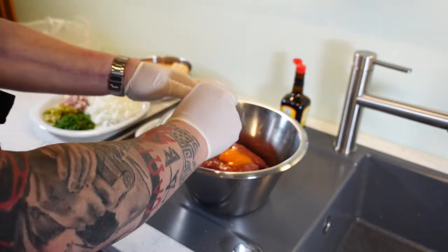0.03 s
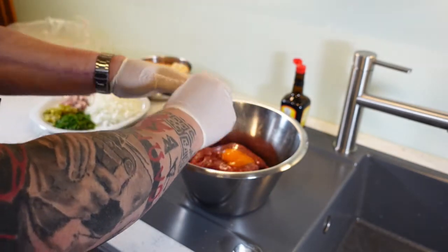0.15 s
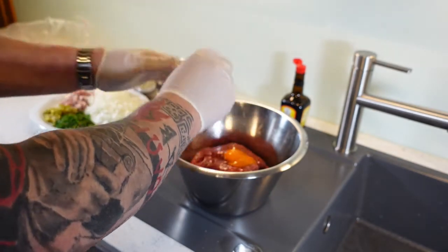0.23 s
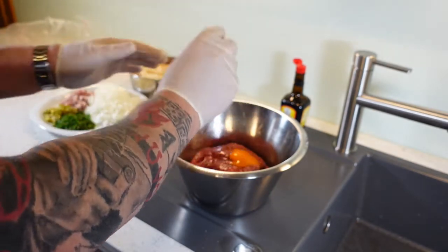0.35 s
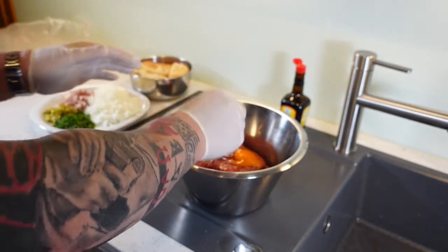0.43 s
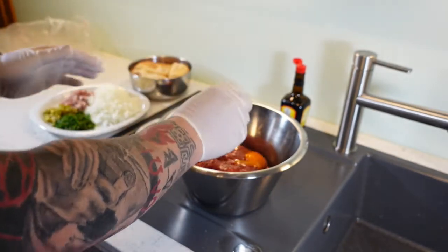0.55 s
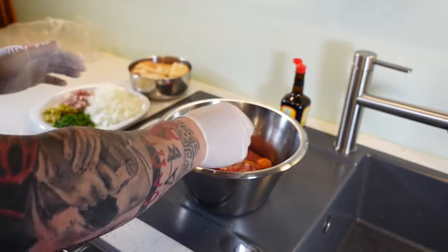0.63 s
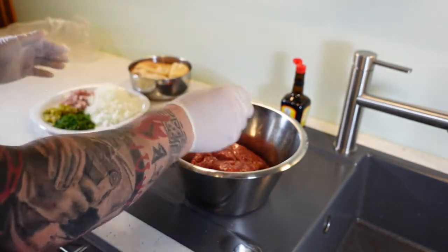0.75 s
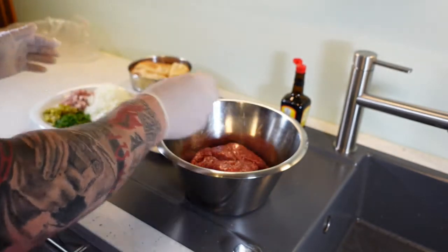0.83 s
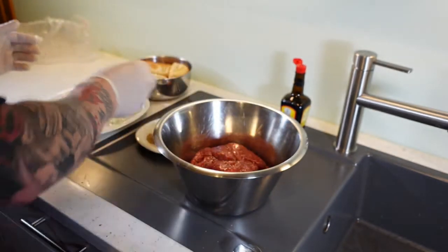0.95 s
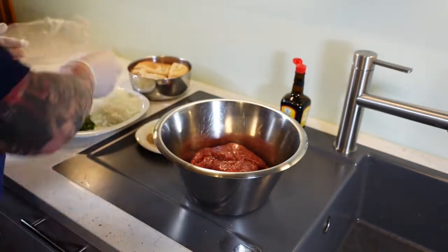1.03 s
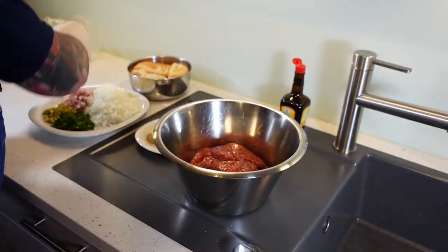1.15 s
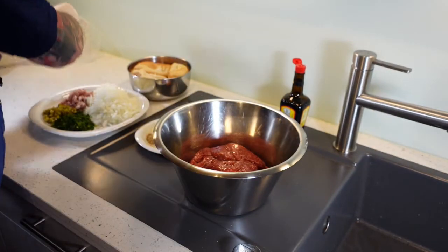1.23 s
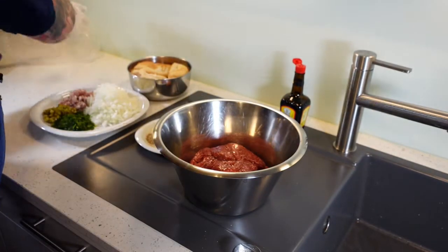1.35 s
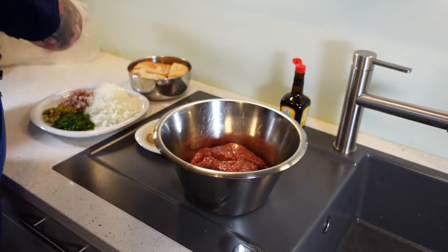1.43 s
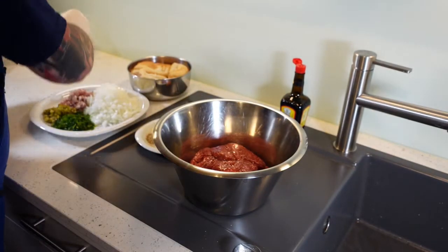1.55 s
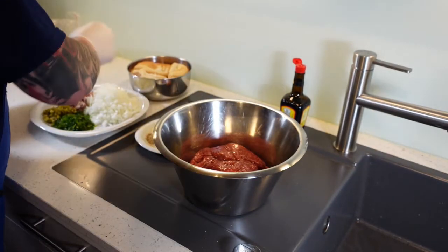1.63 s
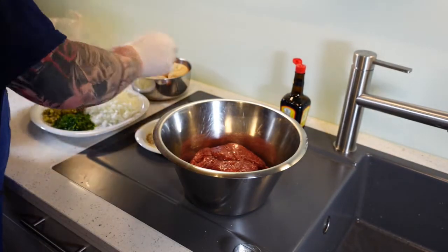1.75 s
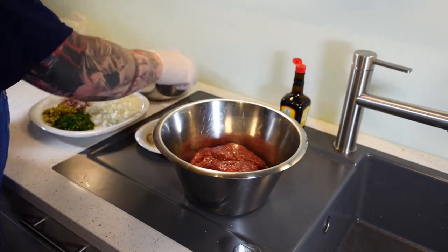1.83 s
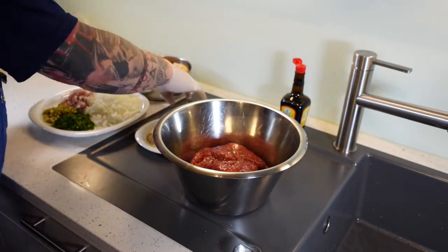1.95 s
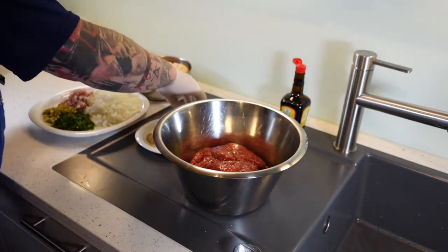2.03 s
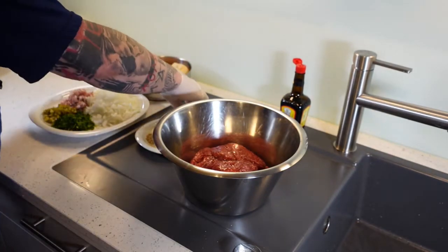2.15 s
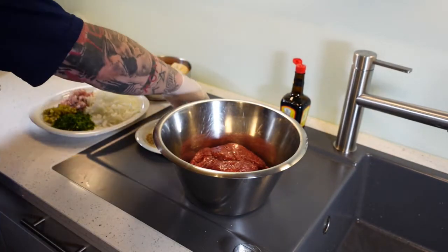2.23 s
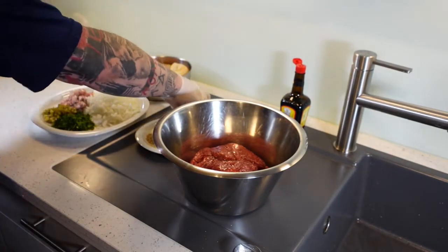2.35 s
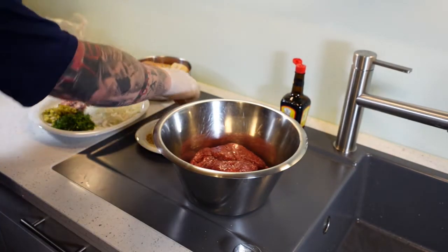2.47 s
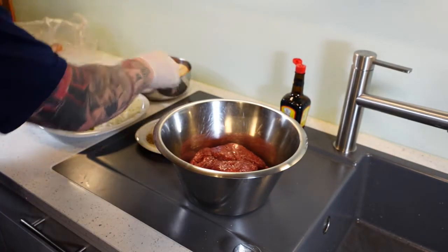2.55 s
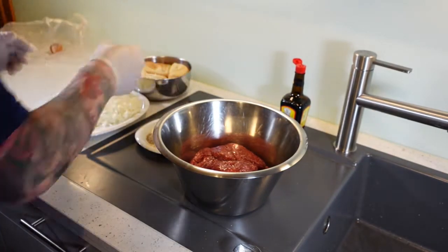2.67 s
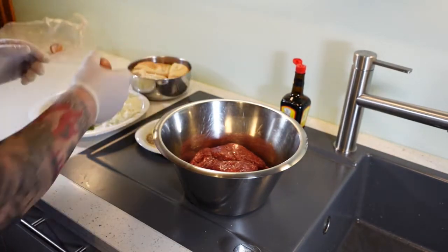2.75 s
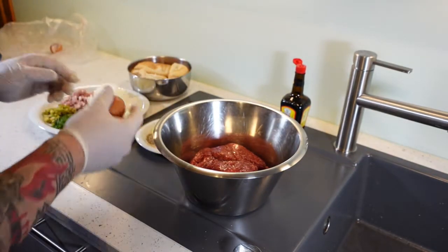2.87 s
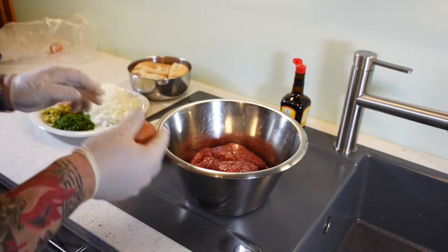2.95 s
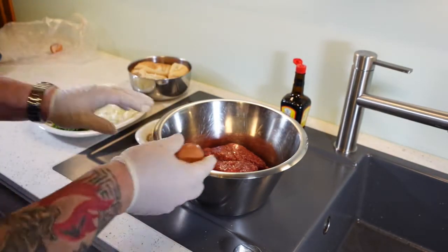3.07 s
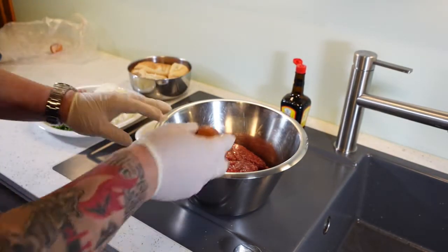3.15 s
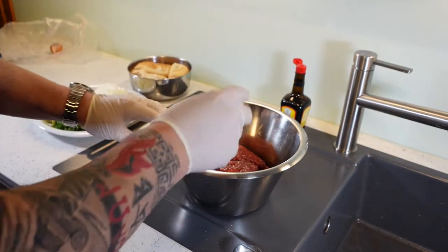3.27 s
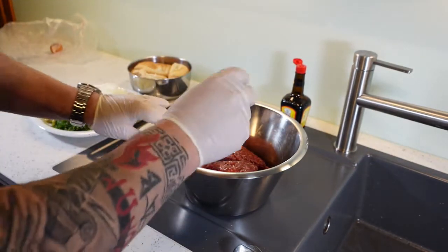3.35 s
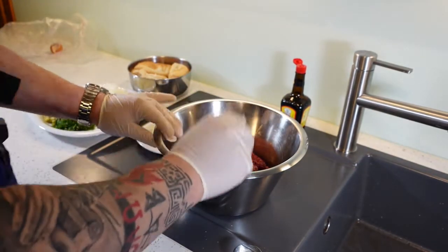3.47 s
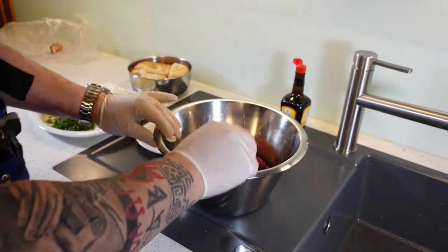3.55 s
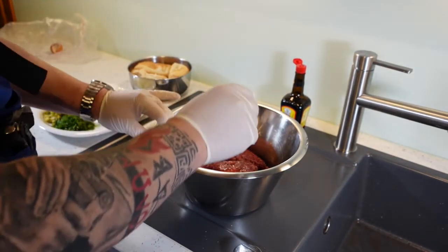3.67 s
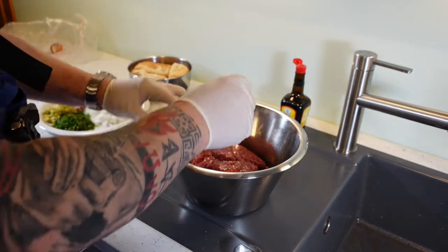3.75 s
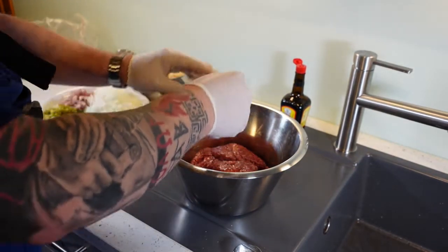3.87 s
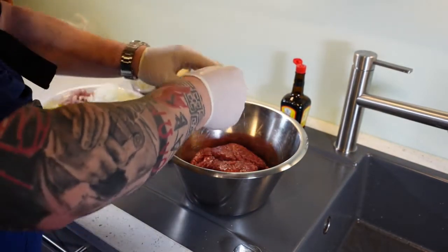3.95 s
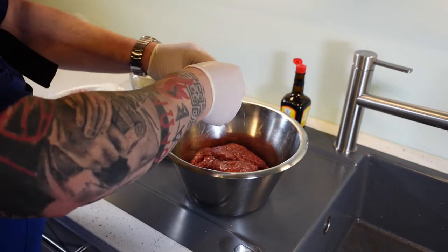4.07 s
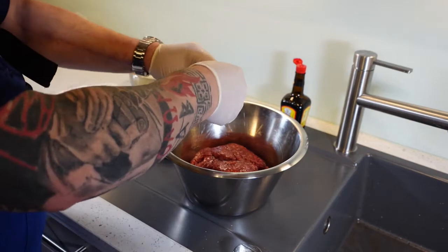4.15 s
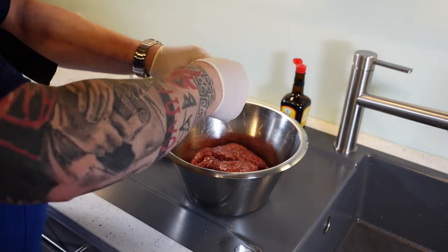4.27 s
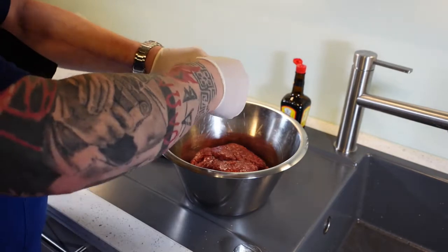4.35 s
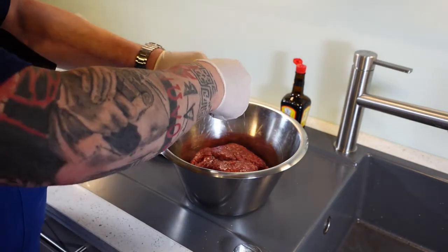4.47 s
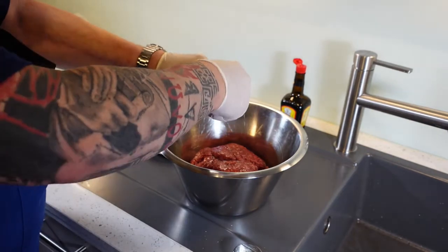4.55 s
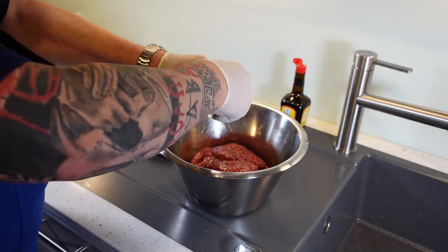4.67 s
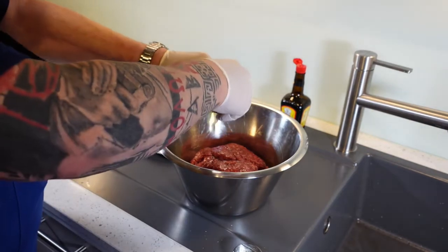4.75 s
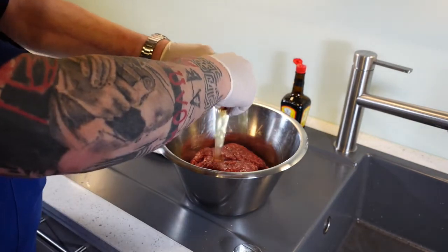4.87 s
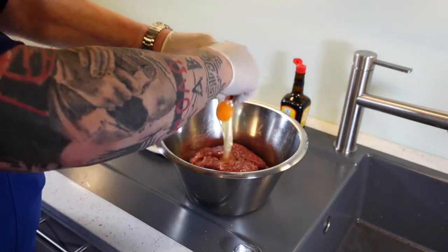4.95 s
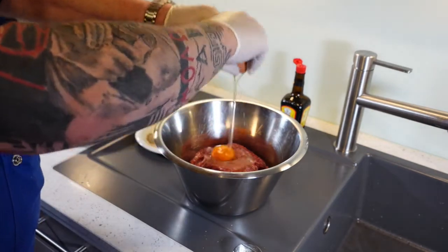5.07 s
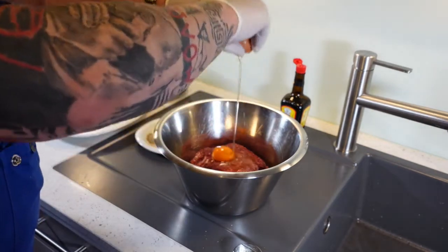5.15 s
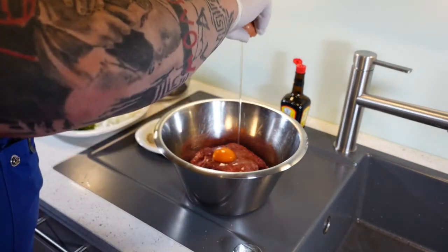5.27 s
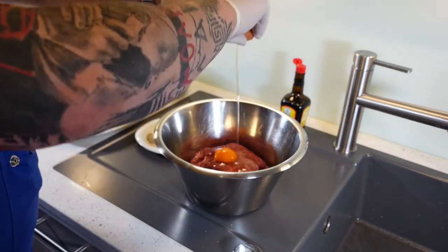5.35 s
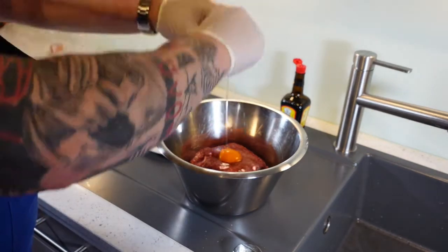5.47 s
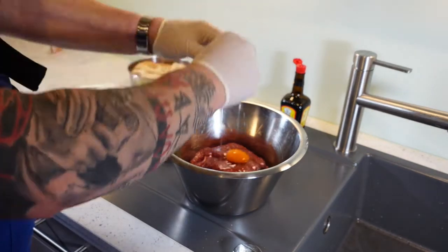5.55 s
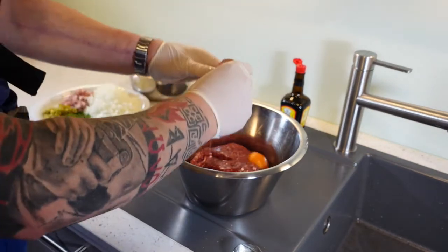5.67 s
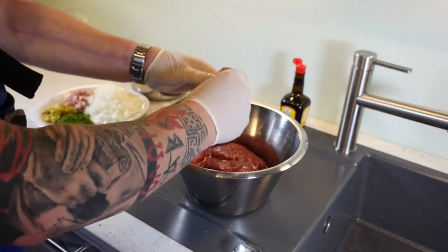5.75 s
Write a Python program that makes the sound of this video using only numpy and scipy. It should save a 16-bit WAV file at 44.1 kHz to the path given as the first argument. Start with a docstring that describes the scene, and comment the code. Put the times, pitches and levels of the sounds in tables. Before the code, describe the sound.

Close stereo microphones in a bright, hard-walled kitchen with low steady ventilation. A sharp eggshell snap and small crackles open, then the shell lands in crinkling thin plastic. An egg rolls faintly in a dish. A soft bump precedes one hard, crunching knock on a steel bowl; the rim rings long and wavering while the shell is cracked open with brittle snaps and gloved rubbing.

```python
"""Shell snaps, plastic crinkles and a hard knock sets a steel bowl ringing in a bright, echoing kitchen.
Gloved hands snap one egg apart, drop the shell in a bin bag and fetch the next egg from a dish.
After a soft bump that egg is knocked on the rim and pulled open, over steady ventilation.
Cracks, knocks and thuds are shaped noise bursts; shell, bowl and rim are decaying sine modes;
rubbing, rolling, sliding and plastic are crackle under moving gains, and dense echoes surround them."""
import sys
import numpy as np
from scipy import signal
from scipy.fft import rfft, irfft
from scipy.io import wavfile
from scipy.ndimage import uniform_filter1d

SR = 44100
rng = np.random.default_rng(int(sys.argv[2]) if len(sys.argv) > 2 else 0)


def transcribe(u):
    """Save the signal u as a 16-bit wav file named by the first command-line argument.

    u: samples, shape (n,) or (channels, n), limited to [-1, 1]; the rate is SR.
    q: integer samples, one column per channel.
    """
    v = np.clip(np.atleast_2d(u).T, -1, 1)
    q = np.round(v * 32767).astype(np.int16)
    wavfile.write(sys.argv[1], SR, q)


N = 256220
TIME = np.arange(N) / SR  # seconds
KNOCK_S = 3.4862  # the moment the egg meets the rim
SHELL_T60_S = 0.0077  # the hand damps the hollow shell

# Levels in the tables are relative: layer gains, filters and echoes act on them later.
# A t60 is the time to fade by 60 dB. A "colour" is the spectrum of a noise filter.

# Steady ventilation. Each row: frequency in Hz, relative level in dB.
AIR_COLOUR = [(15, -62), (25, -24), (55, -19.5), (229, 2.5), (373, -0.5), (531, -6), (1070, -6.5),
              (1740, -6.5), (3250, -7.5), (3720, -8.5), (6210, -9.5), (12200, -16.5), (14400, -18),
              (16000, -15.5)]
# Left-right likeness of the ventilation. Each row: frequency in Hz, likeness from 0 to 1.
AIR_LIKENESS = [(40, 0.59), (400, 0.5), (1400, 0.75), (3000, 0.93), (10000, 0.98)]
# Decay of the kitchen's echoes. Each row: frequency in Hz, t60 in seconds.
KITCHEN_DECAY = [(150, 0.57), (500, 0.46), (1500, 0.49), (3500, 0.49), (8000, 0.44), (15000, 0.31)]
# Left-right likeness of the echoes. Each row: frequency in Hz, likeness from 0 to 1.
ECHO_LIKENESS = [(40, .4), (130, .8), (300, .95), (700, .92), (1500, .87), (5000, .88), (14000, .92)]

# Dull bumps on the worktop and bowl.
# Each row: start in seconds, level in dB, pitch in Hz, t60 in seconds.
BUMP_HITS = [(.728, -57.5, 183, 0.42), (3.203, -37, 182, 0.11), (3.52, -35.5, 187.6, 0.29)]
# Padded thud of a bump. Each row: frequency in Hz, relative level in dB.
THUD_COLOUR = [(40, -13), (110, -9), (170, 5), (280, 2), (450, -16), (1000, -17), (2500, -44), (8000, -64)]
# Hollow of the dish under the rolling egg. Each row: frequency in Hz, relative level in dB.
DISH_COLOUR = [(80, -41), (200, -21), (340, -12), (420, 1), (520, -10), (650, -14), (850, -13.5),
               (1400, -21.5), (3000, -27)]
# Glove sliding inside the dish. Each row: frequency in Hz, relative level in dB.
GLOVE_SLIDE_COLOUR = [(1000, -27), (2200, -10.5), (2750, 1), (3500, -9.5), (4600, 0.5), (5600, -4),
                      (7500, -12.5), (15000, -26)]
# Dish nudged along the worktop. Each row: frequency in Hz, relative level in dB.
DISH_NUDGE_COLOUR = [(290, -39), (500, -12), (649, -15), (919, -5), (1260, -11), (1640, -6), (2260, -6.5),
                     (5470, -2.5), (13300, -13.5), (16000, -26)]

# The bin bag is touched, gives way, then settles twice.
# Each row: start in seconds, rise in seconds, level in dB.
BAG_SURGES = [(1.4245, .002, -32), (1.434, .018, -28), (1.63, 0.11, -41), (1.91, 0.063, -50.5)]
# Crinkling plastic. Each row: frequency in Hz, relative level in dB.
CRINKLE_COLOUR = [(240, -47), (400, -18), (504, -13), (1060, -10), (1650, -6), (1840, -8.5), (2430, -1.5),
                  (14400, -1.5), (16000, -8)]
# Shell landing in the bag. Each row: frequency in Hz, relative level in dB.
SHELL_LANDING_COLOUR = [(35, -68), (60, -41), (281, -13), (636, -17.5), (862, -10.5), (1060, -19),
                        (1280, -5), (1580, -2.5), (2300, 2), (3190, -12), (5860, -4.5), (14600, -20),
                        (16000, -16)]

# Crumbling shell and rubbing gloves.
# Each row: start in seconds, length in seconds, level in dB, tilt in dB per octave.
RUB_STROKES = [(0, 0.07, -42, -1.5), (.178, 0.047, -31.5, 2), (0.413, 0.041, -40, -1),
               (.7, .25, -61.5, 1.5), (0.982, 0.17, -58, -6), (1.086, 0.34, -53, 1.5),
               (2.738, .22, -59.5, 1.5), (3.018, 0.76, -55, 1), (4.37, 0.048, -43, 1.5),
               (4.406, 0.04, -37.5, 1), (4.637, 0.14, -43, 1), (4.854, 0.099, -46, 3),
               (5.001, 0.051, -36.5, -1), (5.483, 0.087, -46.5, -0.5), (5.568, 0.21, -45.5, -1),
               (5.726, .1, -40, -0.5)]
# Rubbing before the tilt. Each row: frequency in Hz, relative level in dB.
STROKE_COLOUR = [(200, -32), (1150, -21), (1500, -3), (1900, -2.5), (2400, -4), (3200, -2), (5500, -1),
                 (8000, 0.5), (11000, -7), (16000, -11.5)]
# Range of the chips' pitches: lowest in Hz, highest in Hz.
CRUMB_PITCHES = (1720, 3700)
# Thin ticks of sticky gloves. Each row: start in seconds, level in dB.
GLOVE_TICKS = [(3.0942, -33.5), (4.0134, -35.5), (4.3634, -30), (4.5768, -34), (5.3794, -40),
               (5.4523, -36.5), (5.49, -28.5), (5.7265, -31)]
# Thin glove tick. Each row: frequency in Hz, relative level in dB.
TICK_COLOUR = [(500, -21), (1800, 0.5), (4000, 2), (9000, 3.5), (16000, -3)]
# Snaps of shell. Each row: start in seconds, level in dB, pitch of the hollow shell in Hz,
# brightness of the fracture in dB.
SHELL_SNAPS = [(0.0895, -9, 2036, -16.5), (0.1398, -21.5, 3280, -7), (.3581, -33.5, 2220, -14),
               (0.4187, -32, 1900, -11.5), (1.0238, -37, 2440, -19), (1.2195, -32.5, 2000, -11),
               (4.628, -27, 1930, -11.5), (4.6652, -25, 1700, -6), (4.6827, -17.5, 1770, -13.5),
               (4.6866, -13, 1840, -19.5), (4.863, -29, 1890, -8), (4.9906, -28.5, 2000, -19),
               (5.004, -21.5, 2060, -1), (5.0983, -25, 2170, -12.5), (5.563, -33.5, 3220, -5),
               (5.599, -32.5, 1900, -0.5), (5.63, -29.5, 1850, -8), (5.778, -27.5, 3100, -2.5)]
# Bright crack of a fracture. Each row: frequency in Hz, relative level in dB.
CRACK_COLOUR = [(300, -20), (1500, -1), (2900, 0.5), (3800, 2.5), (7000, 1), (11000, -4), (16000, -7)]

# Lowest rim mode, a close pair that beats: centre frequency in Hz, level in dB, t60 in seconds.
RIM_MODE = (1251, -20.5, 2.26)
# Quicker modes of the bowl. Each row: frequency in Hz, level in dB, t60 in seconds before damping.
BOWL_MODES = [(1198, -12, .48), (1252, -15, .45), (1502, -29, 1.1), (1557, -12, .62), (1603, -15, .66),
              (1669, -30, 1.3), (2050, -31, 1.0), (2245, -29, 1.0), (2471, -19, .55), (2646, -16, .45),
              (2726, -16, .45), (2896, -20, .45), (3132, -25, .92), (3206, -21, .55), (3245, -17, .48),
              (3280, -15, .48), (3303, -13, .52), (3324, -15, .48), (3357, -14, .48), (3395, -12, .46),
              (3631, -18, .45), (3928, -17, .42), (4306, -20, .45), (4335, -18, .45), (4757, -24, .45),
              (4812, -24, .45), (6488, -26, .4), (6685, -24, .4), (9383, -27, .35)]
# The egg meets the rim, caves in and jolts the bowl; later it brushes the rim.
# Each row: start in seconds, level in dB, t60 in seconds.
RIM_KNOCKS = [(KNOCK_S, -3.5, 0.036), (3.506, -16.5, 0.087), (3.519, -16, .06), (3.545, -12, 0.05),
              (3.568, -16.5, 0.029), (3.6, -25, 0.03), (4.418, -41, .07)]
# Blow on the bowl. Each row: frequency in Hz, relative level in dB.
BLOW_COLOUR = [(40, -35), (120, -23), (185, -12.5), (300, -11), (500, -7.5), (720, -7), (960, -10.5),
               (1230, 0.5), (1400, -7), (1580, -1.5), (1950, -10.5), (2700, -1.5), (3000, -4.5), (3320, 3),
               (3800, -4.5), (5500, -10), (6700, -8.5), (10000, -17.5), (16000, -22.5)]


def amp(db):
    """Turns decibels into gain."""
    return 10 ** (np.asarray(db) / 20)


def evened(x):
    """Scales a sound to an rms of 1."""
    return x / np.sqrt(np.mean(x ** 2) + 1e-20)


def read(points, hz):
    """Reads a table along a log-frequency axis."""
    f, value = np.transpose(points)
    return np.interp(np.log(hz + 1), np.log(f + 1), value)


def add(mix, start_s, sound):
    """Mixes a sound in place from its start time, cutting what runs past the end."""
    part = mix[max(round(start_s * SR), 0):][:len(sound)]
    part += sound[:len(part)]


def envelope(start_s, rise_s, hold_s, t60):
    """Gain over time: the power builds evenly, holds, then dies away."""
    t = TIME - start_s
    rise = np.sqrt(np.clip(t / rise_s, 0, 1))
    return rise * amp(-60 * np.maximum(t - rise_s - hold_s, 0) / t60)


def highpass(x, hz, order):
    """Removes the bass."""
    return signal.sosfilt(signal.butter(order, hz, "high", fs=SR, output="sos"), x)


def colour(x, points):
    """Gives noise a spectrum through a causal, minimum-phase filter of unit energy."""
    log_gain = np.log(amp(read(points, abs(np.fft.fftfreq(8192, 1 / SR)))))
    response = np.exp(np.conj(signal.hilbert(log_gain)))
    taps = np.fft.ifft(response).real[:4096]
    return signal.fftconvolve(x, taps / np.linalg.norm(taps))[:len(x)]


def crackle(count, per_s, spread_db, hiss):
    """Tiny clicks of very unequal size at random times, over a fine hiss."""
    struck = rng.random(count) < per_s / SR
    sign = rng.choice([-1, 1], count)
    size = amp(spread_db * np.minimum(rng.exponential(1, count), 4))
    return evened(evened(struck * sign * size) + hiss * rng.standard_normal(count))


def burst(t60):
    """A flurry of random impulses that dies away, like many micro-fractures."""
    t = TIME[:SR]
    return rng.choice([-1., 1.], len(t)) * amp(-60 * t / t60)


def ring(hz, db, t60, size=SR):
    """One struck mode: a sine that decays exponentially."""
    t = TIME[:size]
    return amp(db - 60 * t / t60) * np.sin(2 * np.pi * hz * t)


def pair(two, likeness):
    """Blends two unrelated signals into a diffuse stereo field, as at two close microphones."""
    same = np.clip(read(likeness, np.fft.rfftfreq(two.shape[1], 1 / SR)), 0, 1)
    mid, side = rfft(two) * np.sqrt([(1 + same) / 2, (1 - same) / 2])
    return irfft(np.array([mid + side, mid - side]), two.shape[1])


def air():
    """Steady ventilation rumble and faint hiss: coloured noise, more alike left and right in the treble."""
    two = np.array([colour(z, AIR_COLOUR) for z in rng.standard_normal((2, N))])
    return amp(-60.5) * pair(two, AIR_LIKENESS)


def kitchen(x, wet_db, build_s=0.0018):
    """Direct sound plus dense reflections from hard walls, each band dying at its own speed."""
    hz, t, z = signal.stft(rng.standard_normal((2, SR)), SR, nperseg=256)
    decay = amp(-60 * t / read(KITCHEN_DECAY, hz)[:, None])
    tail = signal.istft(z * decay, SR, nperseg=256)[1][:, :SR]
    tail = pair(tail, ECHO_LIKENESS) * (1 - np.exp(-TIME[:SR] / build_s))
    tail /= np.linalg.norm(tail[0])
    return x + amp(wet_db) * signal.fftconvolve(x[None], tail, axes=1)[:, :N]


def bumps(thud_db=-3):
    """A low decaying note of the worktop under a padded thud of noise."""
    out = np.zeros(N)
    for start_s, db, hz, t60 in BUMP_HITS:
        add(out, start_s, ring(hz, db, t60))
        add(out, start_s, amp(db + thud_db) * colour(burst(t60), THUD_COLOUR))
    return out


def roll(start_s=2.08, wobble_hz=4.9, wobble_db=2.5):
    """Small bumps of a rolling egg sound the hollow of its dish, louder once in every wobble."""
    swing_db = wobble_db * np.sin(2 * np.pi * wobble_hz * (TIME - start_s))
    motion = amp(-57.5 + swing_db) * envelope(start_s, rise_s=0.011, hold_s=0.2, t60=0.54)
    return motion * colour(crackle(N, per_s=220, spread_db=2, hiss=0.46), DISH_COLOUR)


def dish():
    """Fine stick-slip friction: a glove slides round inside the dish, then the dish is nudged along."""
    sliding = amp(-59) * envelope(2.225, rise_s=0.086, hold_s=0.25, t60=1)
    nudging = amp(-42) * envelope(3.201, rise_s=0.0025, hold_s=0.11, t60=0.12)
    slide = sliding * colour(crackle(N, per_s=3000, spread_db=3, hiss=0.79), GLOVE_SLIDE_COLOUR)
    nudge = nudging * colour(crackle(N, per_s=1100, spread_db=3, hiss=0.86), DISH_NUDGE_COLOUR)
    return slide + nudge


def bin_bag(lands_s=1.448, tap_db=-16, tumble_db=-27, crinkle_t60=0.66):
    """The empty shell taps and tumbles into thin plastic, whose surges of crinkling die away."""
    power = sum((amp(db) * envelope(start_s, rise_s, 0, crinkle_t60)) ** 2
                for start_s, rise_s, db in BAG_SURGES)
    out = np.sqrt(power) * colour(crackle(N, per_s=2000, spread_db=3, hiss=0.58), CRINKLE_COLOUR)
    tap = amp(tap_db) * burst(t60=0.02)
    tumble = amp(tumble_db) * burst(t60=0.53)
    add(out, lands_s, colour(tap + tumble, SHELL_LANDING_COLOUR))
    return out


def rubs(gain_db=-1, early=0.38):
    """Strokes of fine crackle that swell quickly and fade; a smaller 'early' peaks sooner."""
    out = np.zeros(N)
    grains = crackle(N, per_s=2000, spread_db=2.6, hiss=0.47)
    for start_s, length_s, db, tilt in RUB_STROKES:
        part = grains[max(round(start_s * SR), 0):][:round(length_s * SR)]
        progress = np.arange(len(part)) / len(part)
        stroke = np.sin(np.pi * progress ** early)
        tilted = [(hz, level + tilt * np.log2(hz)) for hz, level in STROKE_COLOUR]
        add(out, start_s, amp(db + gain_db) * colour(part * stroke, tilted))
    return out


def ticks(gain_db=-7, t60=0.023, faint_count=4):
    """Short, thin noise clicks: a few clear ones, and a loose faint run as fingers close on the next egg."""
    out = np.zeros(N)
    first_s, span_s, faint_db = 2.64, 0.26, -39.5
    faint = [(first_s + span_s * (k + rng.random()) / faint_count, faint_db) for k in range(faint_count)]
    for start_s, db in GLOVE_TICKS + faint:
        add(out, start_s, amp(db + gain_db) * colour(burst(t60), TICK_COLOUR))
    return out


def crumbs(per_s=70, gain_db=1, spread_db=1):
    """While the fingers work the shell, small chips break off at random and ring briefly."""
    out = np.zeros(N)
    draws = rng.random((len(RUB_STROKES), 64, 3))  # up to 64 chips a stroke
    for (start_s, length_s, db, _), chips in zip(RUB_STROKES, draws):
        for when, pitch, size in chips[:round(per_s * length_s)]:
            hz = np.interp(pitch, [0, 1], CRUMB_PITCHES)
            chip_db = db + gain_db + spread_db * (2 * size - 1)
            add(out, start_s + when * length_s, ring(hz, chip_db, SHELL_T60_S, size=2048))
    return out


def pop():
    """A bubble of egg white pops as the thumbs part the shell; its air rings for a few dozen cycles."""
    out = np.zeros(N)
    add(out, 4.6012, ring(hz=2580, db=-27, t60=0.031))
    return out


def snaps(crack_t60=0.018, crack_db=6, bounce_s=0.0023, bounce=0.33):
    """Each fracture is a bright crack and three brief modes of a shell too small to radiate bass."""
    out, t60 = np.zeros(N), SHELL_T60_S
    for start_s, db, hz, bright_db in SHELL_SNAPS:
        crack = amp(db + bright_db + crack_db) * colour(burst(crack_t60), CRACK_COLOUR)
        hollow = ring(hz, 1, t60) - ring(hz * 1.236, -7, t60) - ring(hz * 0.788, -10, t60)
        add(out, start_s, amp(db) * hollow + crack)
        add(out, start_s + bounce_s, bounce * crack)  # thrown back by the bowl
    return highpass(out, 1350, order=8)


def rim(beat_hz=3.854, swell_s=3.92, right_lag_s=0.0095, right_uneven=0.21):
    """The free rim sings on, swelling and fading as its paired modes beat; on the right one is stronger."""
    hz, db, t60 = RIM_MODE
    t = np.maximum(TIME - KNOCK_S, 0)
    lag_s = np.array([[0], [right_lag_s]])
    uneven = np.array([[0], [right_uneven]])
    beat = np.pi * beat_hz * (TIME - swell_s - lag_s)
    phase = 2 * np.pi * hz * t
    modes = (1 + uneven) * np.sin(phase + beat) + (1 - uneven) * np.sin(phase - beat)
    return (t > 0) * amp(db - 60 * t / t60) * modes / 2


def bowl(gain_db=-10, damping=1.063):
    """The steel wall clangs, neighbouring modes moving in opposite senses; the filling damps them quickly."""
    out = np.zeros(N)
    modes = [(-1) ** k * ring(hz, db + gain_db, t60 / damping) for k, (hz, db, t60) in enumerate(BOWL_MODES)]
    add(out, KNOCK_S, sum(modes))
    return out


def knock(gain_db=1):
    """A hard blow on the rim and a quick run of crunching jolts, then a late brush: coloured noise bursts."""
    out = np.zeros(N)
    for start_s, db, t60 in RIM_KNOCKS:
        add(out, start_s, amp(db + gain_db) * burst(t60))
    return colour(out, BLOW_COLOUR)


def scene():
    """All but the rim and the air get kitchen echoes; the bowl sounds a little to the left."""
    shell_dry = snaps() + highpass(crumbs() + pop(), 1400, order=4) + ticks()
    shell = kitchen(shell_dry, wet_db=-2.2)
    hands_dry = rubs() + bin_bag() + roll() + dish() + highpass(bumps(), 130, order=3)
    hands = kitchen(hands_dry, wet_db=-2.5)
    clang = kitchen(knock(), wet_db=-0.5, build_s=0.014) + kitchen(bowl(), wet_db=-3.5, build_s=0.016)
    panned_clang = clang * amp([[0.3], [-0.3]])  # left, right in dB
    panned_rim = rim() * amp([[0], [-2.6]])
    return shell + hands + panned_clang + panned_rim + air()


def record(dry, limit_db=-7.5, recover_db_per_s=200, edge_hz=16000):
    """A fast limiter holds down the loudest peaks on both sides alike; then the top treble is cut."""
    peak_db = 20 * np.log10(abs(dry).max(0) + 1e-9)
    fall = TIME * recover_db_per_s
    held_peak_db = np.maximum.accumulate(peak_db + fall) - fall  # instant rise, steady fall
    over_db = np.maximum(held_peak_db - limit_db, 0)
    limited = dry / amp(uniform_filter1d(over_db, size=8))
    lowpass = signal.firwin(301, edge_hz, window=("kaiser", 8), fs=SR)
    return signal.oaconvolve(limited, lowpass[None], "same")


dry = scene()
out = record(dry)
transcribe(out)
```